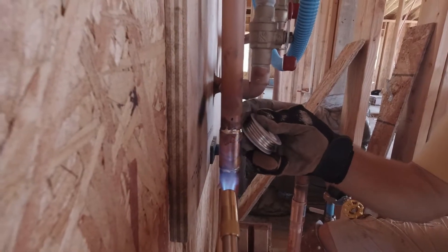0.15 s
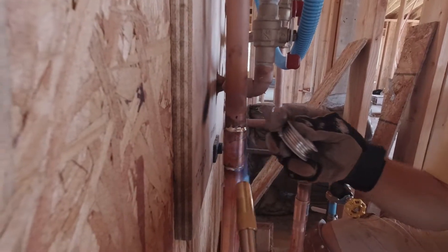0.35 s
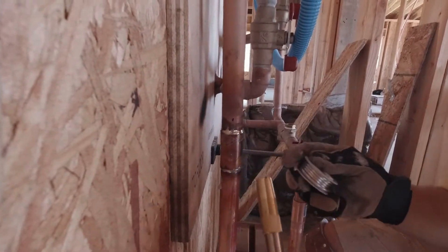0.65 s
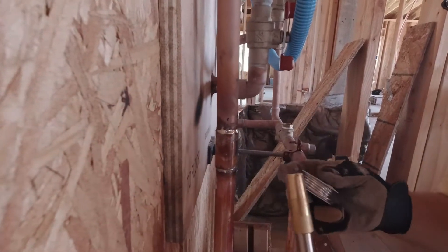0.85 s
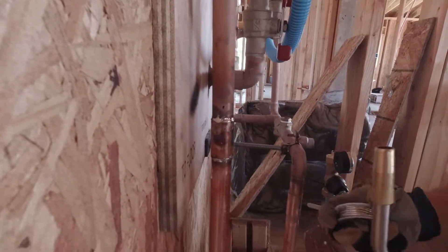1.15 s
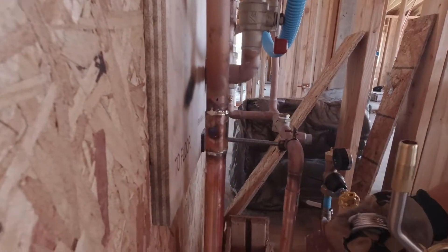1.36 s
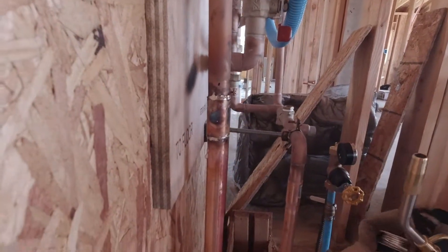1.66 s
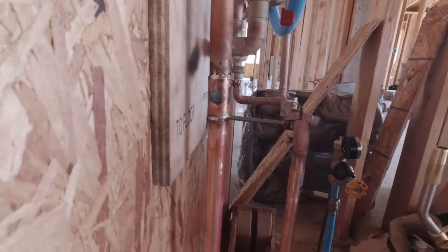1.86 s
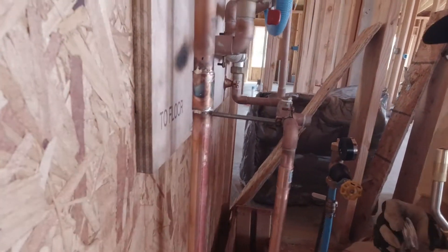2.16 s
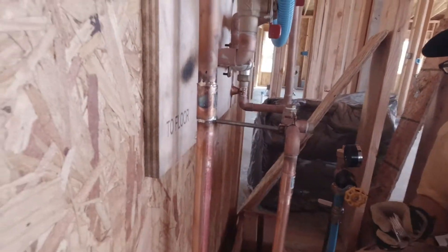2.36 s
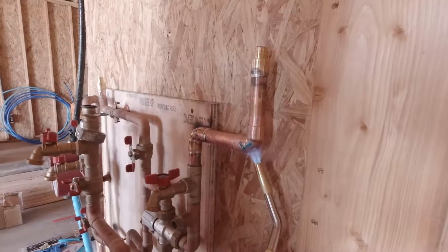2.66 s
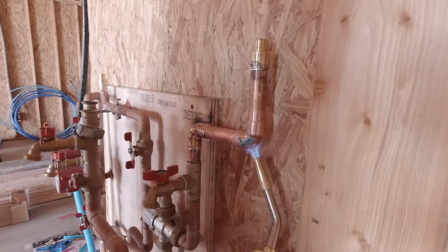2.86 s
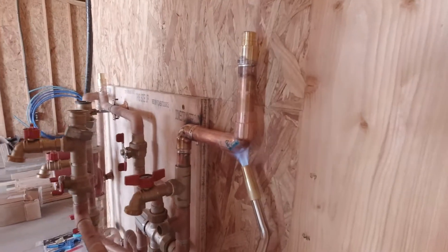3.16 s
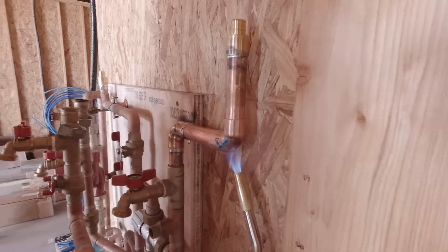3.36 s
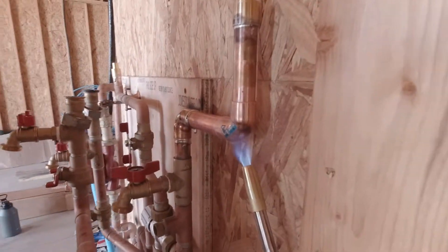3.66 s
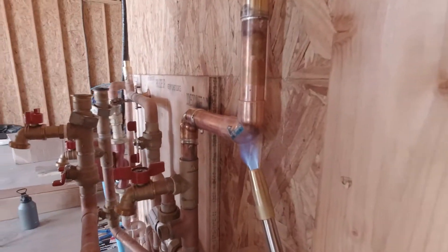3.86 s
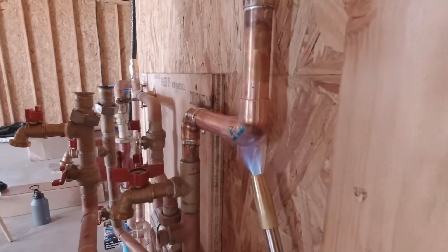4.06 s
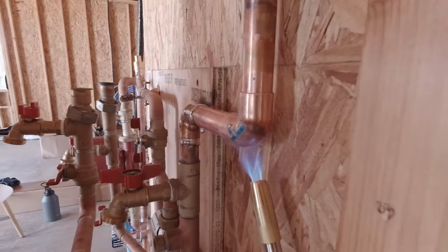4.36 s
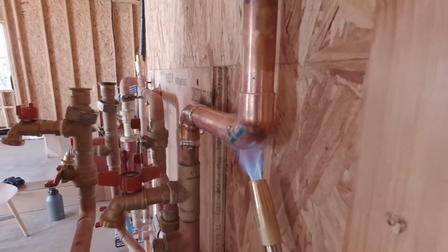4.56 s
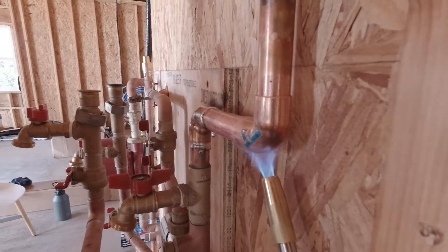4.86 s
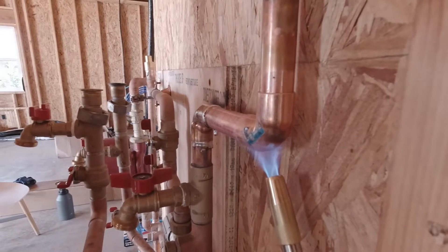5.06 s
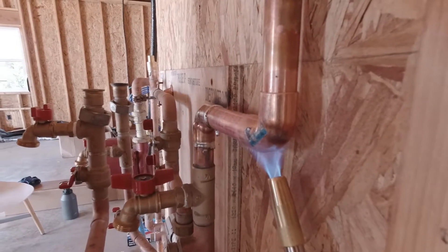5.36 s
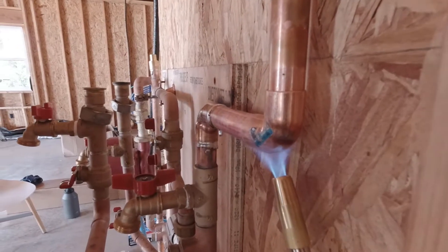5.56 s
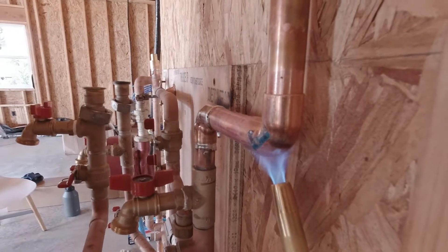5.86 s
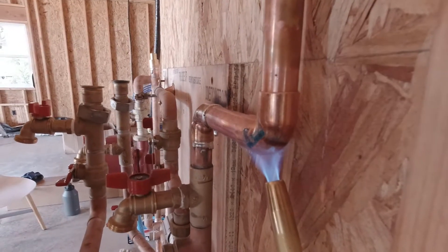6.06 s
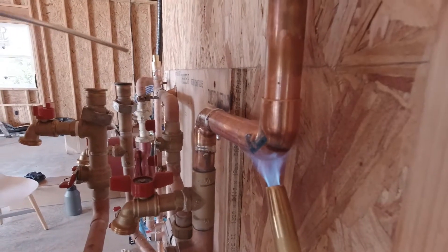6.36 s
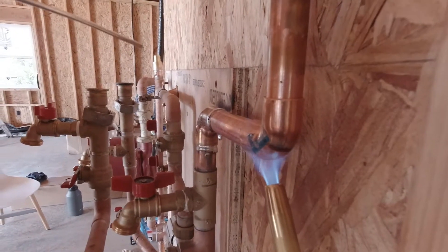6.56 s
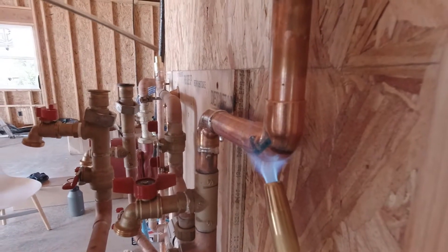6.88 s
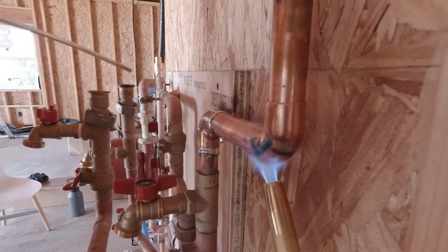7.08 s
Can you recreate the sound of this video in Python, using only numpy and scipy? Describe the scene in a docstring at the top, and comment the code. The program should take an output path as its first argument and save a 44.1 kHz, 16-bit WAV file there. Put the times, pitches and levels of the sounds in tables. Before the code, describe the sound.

A gas torch roars and hisses, shuts off with a pop, then after a quiet pause burns steadily again against metal pipe.

```python
"""A gas torch heats copper pipe in a timber-framed room: the flame roars and the gas jet hisses.
It is shut off, and the flame pops and chirps back into its tube. Tools and hot metal tick, a faint
high tone comes and goes, a sleeve swishes and a shoe scuffs. Then the torch burns again at once on
a second joint and the microphone moves in: the flame's echo from the board wall sweeps down through
the roar, while the jet hisses above it. A far machine hums throughout."""
import sys
import numpy as np
from scipy import signal
from scipy.fft import rfft, irfft, next_fast_len
from scipy.io import wavfile
from scipy.ndimage import uniform_filter1d, map_coordinates

SR = 44100
rng = np.random.default_rng(int(sys.argv[2]) if len(sys.argv) > 2 else 0)


def master_out(mix):
    """Clip the mix to full scale and print it as 16-bit PCM to the path in sys.argv[1]."""
    frames = np.transpose(np.atleast_2d(mix))
    ceiling = np.clip(frames, -1, 1)
    pcm = np.round(ceiling * 32767).astype(np.int16)
    wavfile.write(sys.argv[1], SR, pcm)


N = 318402
TIME = np.arange(N) / SR
HZ = np.fft.rfftfreq(2 * next_fast_len(N // 2 + 1, real=True), 1 / SR)
SHUT_OFF_S, CLOSING_S, RELIGHT_S = 0.39, 0.082, 2.4405
JET_DROP_DB = 33  # how much quieter the jet gets while the valve closes
TOP_HZ = 15900


def burner(roar_db, rasp_db, hiss_db, fizz_db, places, flutter_db):
    """Swirling fire roars and rasps; the jet hisses and fizzes. Places are (power share, colour)."""
    roar_top_hz, rasp_top_hz, hiss_top_hz = 1200, 4200, 8200
    bands = np.array([below(HZ, roar_top_hz),
                      above(HZ, roar_top_hz) * below(HZ, rasp_top_hz),
                      above(HZ, rasp_top_hz) * below(HZ, hiss_top_hz),
                      above(HZ, hiss_top_hz)])
    flutter = flutter_db * wobble(70) + 0.17 * wobble(8.3)  # the flame flutters
    spit = 0.5 * wobble(45) + 0.18 * wobble(7.1)  # the gas flow is slightly uneven
    gains = amp([roar_db + flutter, rasp_db + flutter, hiss_db + spit, fizz_db + spit])
    flame = np.zeros(N)
    for share, tint in places:
        flame += np.sqrt(share) * sum(gain * shaped(band) for gain, band in zip(gains, bands * tint(HZ)))
    return flame


# The flame's tone colour at the first joint: frequency_hz, level_db
FIRST_COLOUR = [(25, -22), (70, -16), (150, -9), (300, -3), (700, -3), (1100, -4.5), (2000, -5.5),
                (3300, -17.5), (4700, -24.5), (6500, -20), (10500, -27), (13500, -40.0), (15800, -51)]
# Peaks from the burner tube and dips from nearby surfaces: centre_hz, width_hz, lift_db
FIRST_PEAKS = [(225, 65, 6.5), (360, 45, -5.5), (466, 110, 3), (1260, 110, 9), (1700, 53, 6.5),
               (2340, 60, 7), (3030, 80, -8), (5220, 290, 8.5), (6140, 190, 9), (6740, 180, 9),
               (7400, 750, 10), (8250, 700, 6.5), (9400, 340, 9), (13250, 450, 8)]


def first_burn():
    """The flame burns steadily until the valve closes; the roar lingers longer than the jet."""
    roar_db = -26.5 - shut_off_loss_db(22)
    rasp_db = -30.5 - shut_off_loss_db(27)
    hiss_db = -39 - shut_off_loss_db(JET_DROP_DB)
    fizz_db = -44 - shut_off_loss_db(JET_DROP_DB)
    places = [(0.96, colour(FIRST_COLOUR, FIRST_PEAKS))]
    flame = burner(roar_db, rasp_db, hiss_db, fizz_db, places, flutter_db=1.0)
    return wall_echo(flame, delay_ms=1.98, strength=0.19)


def shut_off_loss_db(drop_db, drain_db_per_s=67):
    """The level falls as the valve closes ever faster, then as the last gas drains from the tube."""
    closed = np.clip((TIME - SHUT_OFF_S) / CLOSING_S, 0, 1) ** 2
    return drop_db * closed + drain_db_per_s * np.maximum(TIME - SHUT_OFF_S - CLOSING_S, 0)


# How far the microphone is from the flame at the second joint: time_s, distance_m
DISTANCE = [(2.44, 0.59), (2.95, 0.52), (3.45, 0.44), (4.0, 0.361), (4.6, 0.3156), (7.2, 0.31)]
# The flame's tone colour from far, midway and near: frequency_hz, level_db
FAR_COLOUR = [(25, -21), (70, -14.5), (150, -1.5), (300, -0.5), (700, -12), (1100, -3), (2000, -5.5),
              (3300, -14), (4700, -17.5), (6500, -12), (10500, -12.5), (13500, -30), (15800, -37)]
MID_COLOUR = [(25, -40), (70, -15), (150, -7.5), (300, -2.5), (700, -3), (1100, -12.5), (2000, -10),
              (3300, -19.5), (4700, -27), (6500, -19.5), (10500, -14.5), (13500, -33), (15800, -48)]
NEAR_COLOUR = [(25, -39), (70, -17.5), (150, -7), (300, -1), (700, -5), (1100, -11.5), (2000, -18.5),
               (3300, -29.5), (4700, -30), (6500, -26.5), (10500, -22.5), (13500, -37.5), (15800, -53)]
# Tube peaks and surface dips at those three places: centre_hz, width_hz, lift_db
FAR_PEAKS = [(475, 200, 8), (770, 330, 12.5), (1363, 44, 5.5), (2030, 65, -7), (2400, 51, 6.5),
             (2900, 65, -8), (6200, 740, 4), (7980, 700, 3), (9860, 120, 1), (11700, 640, -2.5),
             (12550, 330, 2)]
MID_PEAKS = [(437, 140, -10.5), (890, 140, 2), (1114, 45, 6), (1620, 59, 5), (2376, 75, 7.5),
             (2484, 140, -13), (2880, 200, -6), (5700, 80, -20), (8440, 550, 3.5), (11800, 700, -7),
             (12500, 150, 3)]
NEAR_PEAKS = [(410, 160, -6.5), (555, 100, 2.5), (1108, 140, 4), (1290, 60, -3.5), (1530, 200, 5),
              (1860, 33, -0.5), (2335, 120, 6), (2940, 680, 5.5), (3340, 370, 5), (6400, 380, 2.5),
              (8080, 630, 3), (8520, 660, -4)]
# The flame flares up: peak_s, half_length_s, roar_lift_db, rasp_lift_db
FLARES = [(5.758, 0.022, 3.5, 1.5), (7.08, 0.22, 1.5, 2.5)]
# The jet swings towards the microphone: peak_s, half_length_s, hiss_lift_db, fizz_lift_db
JET_SWINGS = [(3.08, 0.19, 1.5, 1), (3.86, .23, 1.5, 4), (4.3, 0.23, -0.5, 2.2), (6.98, 0.24, 3.5, -0.5)]
# Peaks and dips that come and go in the roar; the deep bass thins at the end:
# peak_s, half_length_s, centre_hz, glide_hz_per_s, width_hz, lift_db
ROAR_SWEEPS = [(3, 0.33, 1040, -230, 220, 3.5), (3.65, 0.7, 1077, -230, 110, -7.5),
               (3.26, 0.64, 512, -130, 120, -5.5), (3.7, .5, 1580, -520, 110, -2.5),
               (4.3, 0.51, 2000, -300, 130, -2.5), (3.47, 0.17, 2670, -900, 150, -9),
               (3.42, 0.15, 2900, -900, 180, 6), (3.93, 0.17, 2070, -200, 130, -6),
               (3.15, .22, 1570, -400, 210, 2), (3.45, 0.21, 720, -250, 160, -0.5),
               (3.8, 0.22, 1155, -200, 130, 3), (6.6, 0.45, 1660, 0, 130, -6),
               (4.06, 0.37, 2860, -130, 190, -4), (2.46, .25, 2700, -300, 250, 4.5),
               (2.8, 0.33, 1460, -200, 420, 2), (2.43, 0.54, 410, 1.5, 290, 3), (5.78, 0.13, 567, 0, 53, 7),
               (6.76, 0.69, 2360, 0, 220, -6), (3.6, 2.6, 221, -0.5, 48, -3.5), (2.8, .9, 283, 0, 65, 1.5),
               (7.15, 0.32, 40, 0, 410, -4.5)]
# Peaks and dips in the hiss as the jet turns:
# peak_s, half_length_s, centre_hz, glide_hz_per_s, width_hz, lift_db
HISS_SWEEPS = [(3.469, 0.17, 5600, 100, 500, -6), (4.26, 0.19, 5900, 300, 504, -5),
               (4.8, 0.6, 7200, 0, 880, -4.5), (3.39, 0.21, 7300, -900, 2300, -5),
               (3.27, .16, 5280, 0, 220, 4), (3.85, .22, 5500, 0, 260, 0), (6.45, .45, 5550, 0, 220, -7),
               (6.45, .45, 4400, 0, 300, -5), (2.5, .08, 6280, 0, 240, -4), (3.42, 0.18, 8650, 0, 270, 1),
               (4.35, 0.13, 6560, 0, 160, 5), (2.73, .35, 9750, 0, 450, 2), (2.9, .25, 7950, -1400, 260, 4),
               (3.88, 0.18, 7850, -1600, 240, 4), (3.1, .2, 9950, 0, 220, 4),
               (3.8, 0.22, 8500, -700, 450, 3), (4.6, 0.41, 4360, -3, 1100, 4),
               (4.4, 0.87, 12000, 0, 350, 5), (4.5, 1.1, 13400, 0, 400, 5)]


def second_burn():
    """Distance sets the flame's loudness, colour and echo; the jet's hiss depends on its aim."""
    distance_m = np.interp(TIME, *np.transpose(DISTANCE))
    start_m = DISTANCE[0][1]
    closer_db = 20 * np.log10(start_m / distance_m)
    roar_db, rasp_db = np.array([[-24], [-30.5]]) + lifts(FLARES) + closer_db
    hiss_db, fizz_db = -33.5 + lifts(JET_SWINGS)
    far_m, mid_m, near_m = 0.482, 0.369, 0.315  # where each colour is heard alone
    far = np.interp(distance_m, [mid_m, far_m], [0, 1])
    near = np.interp(distance_m, [near_m, mid_m], [1, 0])
    places = [(far, colour(FAR_COLOUR, FAR_PEAKS)),
              ((1 - far) * (1 - near), colour(MID_COLOUR, MID_PEAKS)),
              (near, colour(NEAR_COLOUR, NEAR_PEAKS))]
    flame = burner(roar_db, rasp_db, hiss_db, fizz_db, places, flutter_db=0.39)
    flame = swept(flame, ROAR_SWEEPS + HISS_SWEEPS, size=2048) * (TIME > RELIGHT_S)
    # As the microphone nears, the echo lags more and grows weaker beside the flame.
    delay_ms = 0.865 + 4.47 * (start_m - distance_m)
    return wall_echo(flame, delay_ms, strength=0.22 * distance_m / start_m)


def wall_echo(flame, delay_ms, strength):
    """The flame is joined by its echoes from the face and the edge of the board behind the pipe."""
    face = filtered(flame, lambda hz: below(hz, 8000, order=2))  # rough board scatters the treble
    edge = filtered(face, lambda hz: above(hz, 2300))  # the narrow edge returns only high sounds
    echo = delayed(face, delay_ms) - delayed(edge, delay_ms + 0.452)  # the edge's wave is upside down
    return (flame + strength * echo) / np.sqrt(1 + strength ** 2)


# Breathy whistles of the gas jet: peak_s, half_length_s, pitch_hz, level_db
JET_WHISTLES = [(0.101, 0.28, 6270, -43), (2.5, 0.08, 5980, -39), (2.53, .07, 6560, -45),
                (2.66, 0.09, 6400, -39), (2.858, .1, 6340, -42), (3.07, .07, 6380, -39.5),
                (3.19, 0.065, 6170, -39), (3.33, .06, 7450, -42), (3.42, .17, 5290, -48),
                (3.45, 0.12, 5980, -45), (3.65, .1, 6300, -45), (3.93, 0.14, 5300, -47),
                (3.92, 0.11, 5950, -50), (4.01, .05, 7500, -41), (4.303, .1, 6320, -38.5),
                (4.452, 0.16, 5260, -44), (6.13, .17, 6280, -42), (6.22, .24, 5260, -46),
                (6.68, .25, 6290, -39), (6.66, .19, 5230, -47), (7.08, .15, 6250, -43)]


def jet_whistles(width_hz=130, flutter_db=2):
    """Gas rushing past an edge catches on one whistle after another while the valve is open."""
    valve = amp(-shut_off_loss_db(JET_DROP_DB)) + (TIME > RELIGHT_S)
    tones = np.zeros(N)
    for peak_s, half_s, pitch_hz, level_db in JET_WHISTLES:
        narrow_noise = noise(lambda hz: below(2 * abs(hz - pitch_hz), width_hz, order=4))
        tones += amp(level_db) * swell(peak_s, half_s, half_s) * narrow_noise
    return valve * amp(flutter_db * wobble(18)) * tones


# The flame pops in the tube: start_s, level_db, pitch_hz, fade_s
POPS = [(0.5838, -6, 197, 0.011), (0.5918, -30, 130, 0.036), (0.6223, -16.5, 178, 0.018)]


def pops():
    """Starved of gas, the flame stutters in the tube: each pop is a low thump with a puff of noise."""
    out, t = np.zeros(N), np.arange(SR // 8) / SR
    rise = np.minimum(t / 0.0033, 1) ** 2
    for start_s, level_db, pitch_hz, fade_s in POPS:
        thump = -np.sin(2 * np.pi * pitch_hz * t) * fade(t, fade_s)
        puff = signal.lfilter(*signal.butter(2, 800, fs=SR), rng.standard_normal(len(t)))
        puff = unit(puff) * fade(t, 0.028)
        add(out, start_s, amp(level_db) * rise * (1.74 * thump + 0.13 * puff))
    return out


def chirp(start_s=0.593, rise_s=0.0073, hold_s=0.026, start_hz=1440, sag_hz_per_s2=130000):
    """As the flame dies the tube sings briefly and unsteadily, sagging ever faster in pitch."""
    out, t = np.zeros(N), np.arange(SR // 8) / SR
    envelope = np.minimum(t / rise_s, 1) * fade(np.maximum(t - hold_s, 0), 0.07)
    pitch_hz = start_hz - sag_hz_per_s2 * t ** 2 + 25 * wobble(260)[:len(t)]
    level_db = -32 + 0.5 * wobble(340)[:len(t)]
    add(out, start_s, amp(level_db) * envelope * np.sin(2 * np.pi * np.cumsum(pitch_hz) / SR))
    return out


# Ticks of the trigger, tools and hot metal:
# start_s, crack_db, lowest_hz, highest_hz, fade_s, ring_db, lower_ring_hz, upper_ring_hz, knock_db
TICKS = [(.5362, -28.5, 6500, 12500, 0.015, -41, 2370, 2850, -60),
         (0.5366, -41, 900, 4500, .016, -35, 1020, 1320, -54),
         (0.586, -54, 6000, 11000, 0.014, -49, 4280, 5350, -52),
         (0.6245, -63, 5000, 10000, 0.019, -44, 1500, 1610, -50),
         (.6268, -54, 5500, 10000, 0.013, -52, 5950, 8300, -56),
         (.6603, -47, 8050, 12540, 0.02, -51, 2150, 6400, -62),
         (.6655, -45, 8500, 14000, .014, -56, 9500, 13000, -72),
         (0.6737, -42, 3500, 11000, 0.02, -40, 2170, 2400, -33.5),
         (.7265, -45, 8800, 14000, 0.013, -50, 9900, 10900, -70),
         (1.1146, -50, 7600, 13100, .012, -59, 9300, 10200, -82),
         (1.277, -52, 1800, 11000, .008, -62, 4000, 9000, -76),
         (1.6515, -57, 8000, 12000, .016, -48, 9400, 10600, -80),
         (1.7395, -41, 4000, 11000, .03, -53, 4300, 5350, -64),
         (2.186, -50, 1400, 3800, 0.079, -58, 2650, 3400, -80),
         (2.32, -43, 2000, 8000, .035, -52, 3400, 6800, -58),
         (2.604, -26, 3500, 7000, .02, -26, 5500, 6360, -40),
         (4.115, -17, 4000, 10000, 0.012, -29, 6997, 8300, -45)]
# The notes of the torch body when knocked: pitch_hz, level_db, fade_s
TORCH_BODY = [(650, 4.5, 0.048), (1100, -4, .02), (2050, -10, 0.018)]


def ticks(pure_share=0.44, ring_sharpness=18):
    """Each contact cracks, rings at two pitches (part pure, part rattle) and knocks the torch body."""
    out, t = np.zeros(N), np.arange(SR // 6) / SR
    body = sum(amp(db) * fade(t, fade_s) * np.sin(2 * np.pi * hz * t) for hz, db, fade_s in TORCH_BODY)
    for start_s, crack_db, low_hz, high_hz, fade_s, ring_db, *rings_hz, knock_db in TICKS:
        white = rng.standard_normal(len(t))
        crack = signal.lfilter(*signal.butter(3, high_hz, fs=SR), white)
        crack = signal.lfilter(*signal.butter(3, low_hz, 'high', fs=SR), crack)
        rattle = sum(unit(signal.lfilter(*signal.iirpeak(hz, ring_sharpness, fs=SR), white))
                     for hz in rings_hz)
        pure = sum(np.sqrt(2) * np.sin(2 * np.pi * hz * t) for hz in rings_hz)
        rings = np.sqrt(pure_share) * pure + np.sqrt(1 - pure_share) * rattle
        contact = (amp(crack_db) * crack + amp(ring_db) * rings) * fade(t, fade_s)
        add(out, start_s, contact + amp(knock_db) * body)
    return signal.lfilter(*signal.butter(4, 14000, fs=SR), out)


# Strokes of a sleeve, the last a faint scrape that leads into the shoe's scuffs: peak_s, rise_s, fall_s,
# level_db, brightness_hz
SLEEVE_STROKES = [(1.41, .035, 0.087, -59, 2400), (1.555, 0.12, 0.059, -44.5, 19000),
                  (1.65, .05, 0.18, -62, 11000), (1.77, .03, 0.06, -57.5, 14000),
                  (1.95, 0.14, .3, -66.5, 12000), (2.2, .012, 0.027, -58, 3000),
                  (2.29, 0.016, 0.022, -60, 9000)]
# The tone colour of rubbing cloth: frequency_hz, level_db
CLOTH_COLOUR = [(100, -11), (300, -14), (700, -2.5), (1500, -5), (2350, -5.5), (2750, -3), (3250, -4.5),
                (4800, -3), (7500, -5.5), (10500, -9.5), (12800, -17), (15900, -28)]
# Peaks and dips from its folds: peak_s, half_length_s, centre_hz, glide_hz_per_s, width_hz, lift_db
SLEEVE_FOLDS = [(1.495, .035, 6350, -8000, 500, 7), (1.505, .04, 5000, -9000, 650, 8),
                (1.55, .065, 2780, -1500, 240, 9), (1.485, .03, 3000, -8000, 2400, -3),
                (1.53, 0.054, 880, 0, 1300, -6), (1.65, .07, 3300, 0, 1100, 6),
                (1.46, .05, 1620, 0, 300, 8), (1.42, .04, 5400, 0, 1200, 2), (2.2, .04, 850, 0, 700, -10)]


def sleeve():
    """Cloth rubs, and its sliding folds colour the swish."""
    return swept(rub(SLEEVE_STROKES, CLOTH_COLOUR, grain_db=1.0), SLEEVE_FOLDS, size=512)


# Scuffs of a shoe: peak_s, rise_s, fall_s, level_db, brightness_hz
SCUFFS = [(2.325, 0.008, .13, -58, 8000), (2.354, 0.033, 0.038, -45.5, 14100)]
# The tone colour of its sole: frequency_hz, level_db
SOLE_COLOUR = [(100, -26), (400, -5), (760, 1), (1000, -8), (2800, -11), (3500, -10), (4400, -13),
               (5400, -19), (6600, -19), (10000, -22), (15000, -38)]


def shoe():
    """A sole shifts and scrapes on the floor."""
    return rub(SCUFFS, SOLE_COLOUR, grain_db=2.0)


def rub(strokes, spectrum, grain_db):
    """Strokes of rubbing noise, grainy as the surfaces catch and slip."""
    grain = unit(amp(grain_db * wobble(300)))
    out = np.zeros(N)
    for peak_s, rise_s, fall_s, level_db, bright_hz in strokes:
        friction = noise(lambda hz: amp(along(spectrum, hz)) * below(hz, bright_hz, order=4))
        out += amp(level_db) * swell(peak_s, rise_s, fall_s) * friction
    return grain * out


# How long the room rings: frequency_hz, fade_s
ROOM_FADES = [(150, 1), (500, 0.45), (1350, 0.55), (2200, 0.23), (4500, 0.6), (12000, 0.16)]


def room_echo(sound):
    """The bare timber room rings longest in the bass."""
    hz, t, spectra = signal.stft(rng.standard_normal(SR), SR, nperseg=256)
    tail = signal.istft(spectra * fade(t, along(ROOM_FADES, hz)[:, None]), SR, nperseg=256)[1]
    late_sound = np.pad(sound, (256, 0))
    return signal.fftconvolve(late_sound, tail / np.linalg.norm(tail))[:N]


# A thin tone lingers faintly, then swells twice: start_s, rise_s, hold_s, pitch_hz, level_db, fall_s
THIN_TONES = [(.53, .04, .18, 4730, -77, .1), (.83, .04, 0.17, 4840, -68, .04),
              (1.91, .05, .12, 4790, -67, .08)]


def thin_tone(start_s, rise_s, hold_s, pitch_hz, level_db, fall_s):
    """A high, slightly unsteady tone swells, holds and fades, with a breathy edge just below it."""
    age_s = TIME - start_s
    envelope = np.clip(age_s / rise_s, 0, 1) * np.exp(-np.maximum(age_s - hold_s, 0) / fall_s)
    phase = 2 * np.pi * np.cumsum(pitch_hz + 36 * wobble(250)) / SR
    gain = amp(level_db + 3 * wobble(60.7))
    breath = amp(-4) * fuzzy_tone(4680, width_hz=250)
    return gain * envelope * (np.sqrt(2) * np.sin(phase) + breath)


# A machine running somewhere in the building: pitch_hz, level_db
MACHINE_HUM = [(100, -76), (139, -74), (236, -76)]
# The tone colour of the room's air: frequency_hz, level_db
AIR_COLOUR = [(20, 0), (50, -10.5), (95, -11.5), (160, -20.5), (240, -27), (330, -25), (1200, -37.5),
              (2800, -46.5), (4700, -37.5), (6500, -46), (8400, -33.5), (11000, -38), (15900, -58)]


def background():
    """Quiet room air, a far hum, and the thin tone that comes and goes."""
    tone = sum(thin_tone(*row) for row in THIN_TONES)
    hum = sum(amp(db) * fuzzy_tone(hz, width_hz=6.3) for hz, db in MACHINE_HUM)
    air = noise(lambda hz: amp(along(AIR_COLOUR, hz)))
    return amp(-54) * air + hum + tone


def drift(sound, depth_db):
    """Shifting echoes lay slowly wandering peaks and dips over the treble."""
    hz, _, spectra = signal.stft(sound, SR, nperseg=1024)
    ripples = rng.standard_normal(spectra.shape)
    for _ in range(2):  # smooth across pitch, then across time
        ripples = uniform_filter1d(ripples, size=5, axis=0)
        ripples = uniform_filter1d(ripples, size=22, axis=1)
    gain_db = depth_db * unit(ripples) * above(hz, 1140)[:, None]
    return signal.istft(spectra * amp(gain_db), SR, nperseg=1024)[1][:N]


def swept(sound, sweeps, size):
    """Let gliding peaks and dips come and go in a sound."""
    hz, t, spectra = signal.stft(sound, SR, nperseg=size)
    gain_db = np.zeros(spectra.shape)
    for peak_s, half_s, centre_hz, glide_hz_per_s, width_hz, lift_db in sweeps:
        offset_hz = hz[:, None] - centre_hz - glide_hz_per_s * (t - peak_s)
        band = 2 ** -np.minimum((2 * offset_hz / width_hz) ** 2, 20)
        gain_db += lift_db * np.exp(-((t - peak_s) / half_s) ** 2) * band
    return signal.istft(spectra * amp(gain_db), SR, nperseg=size)[1][:N]


def colour(spectrum, peaks):
    """A tone colour: the gain at each frequency, from a smooth curve plus peaks and dips."""
    def gain(hz):
        lift_db = sum(db / (1 + (2 * (hz - centre) / width) ** 2) for centre, width, db in peaks)
        return amp(along(spectrum, hz) + lift_db)
    return gain


def fuzzy_tone(pitch_hz, width_hz):
    """A tone that wanders at random, blurring its pitch over width_hz."""
    phase = 2 * np.pi * pitch_hz * TIME
    slow = 1 / (1 + (2 * HZ / width_hz) ** 2)
    return shaped(slow) * np.cos(phase) + shaped(slow) * np.sin(phase)


def noise(response):
    """Noise coloured by a function that gives the gain at each frequency."""
    return shaped(response(HZ))


def shaped(gains):
    """Noise of average power 1, with one gain for each frequency in HZ."""
    real, imaginary = rng.standard_normal((2, len(gains)))
    return unit(irfft((real + 1j * imaginary) * gains)[:N])


def filtered(sound, response):
    """Turn each frequency of a sound up or down."""
    size = next_fast_len(N + 8192)
    return irfft(rfft(sound, size) * response(np.fft.rfftfreq(size, 1 / SR)), size)[:N]


def below(hz, edge_hz, order=24):
    """A gain that keeps what is below the edge; a higher order cuts more sharply."""
    return 1 / np.sqrt(1 + (hz / edge_hz) ** order)


def above(hz, edge_hz):
    """A gain that keeps what is above the edge."""
    return np.sqrt(1 - below(hz, edge_hz) ** 2)


def along(points, hz):
    """Read between (frequency_hz, value) points, with octaves evenly spaced."""
    points_hz, values = np.transpose(points)
    return np.interp(np.log(hz + 1), np.log(points_hz), values)


def wobble(rate):
    """A smooth random curve through `rate` points a second."""
    return map_coordinates(rng.standard_normal(int(N * rate / SR) + 4), [TIME * rate])


def swell(peak_s, rise_s, fall_s):
    """A smooth hump of height 1."""
    return np.exp(-((TIME - peak_s) / np.where(TIME < peak_s, rise_s, fall_s)) ** 2)


def lifts(rows):
    """Passing changes of level in dB, one curve for each lift column."""
    return sum(np.outer(lift_db, swell(peak_s, half_s, half_s)) for peak_s, half_s, *lift_db in rows)


def fade(t, fade_s):
    """A gain that falls by 60 dB in fade_s."""
    return amp(-60 * t / fade_s)


def delayed(sound, delay_ms):
    """The same sound, arriving later."""
    return np.interp(TIME - delay_ms / 1000, TIME, sound)


def add(track, start_s, sound):
    """Mix a sound into a track."""
    part = track[round(start_s * SR):][:len(sound)]
    part += sound[:len(part)]


def amp(db):
    """Turn decibels into a gain."""
    return 10 ** (np.asarray(db) / 20)


def unit(x):
    """Scale to an average power of 1."""
    return x / np.sqrt(np.mean(x ** 2) + 1e-20)


def scene():
    """Everything reaches one microphone, alike in both channels."""
    flame = drift(first_burn() + second_burn(), depth_db=1.3) + jet_whistles()
    knocks = pops() + ticks()
    tube_chirp = chirp()
    movement = drift(sleeve() + shoe(), depth_db=1.5)
    echoes = room_echo(amp(-19.5) * flame + amp(-16.5) * knocks + amp(-24) * tube_chirp)
    mono = flame + knocks + tube_chirp + movement + echoes + background()
    return np.array([mono, mono])


def record(dry):
    """The very highest treble is cut off sharply."""
    return np.array([filtered(channel, lambda hz: below(hz, TOP_HZ, order=300)) for channel in dry])


dry = scene()
out = record(dry)
master_out(out)
```